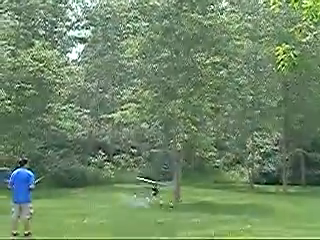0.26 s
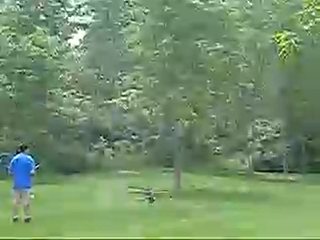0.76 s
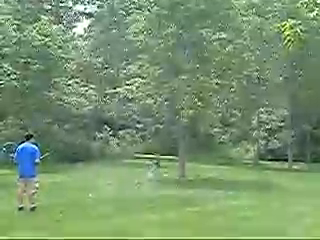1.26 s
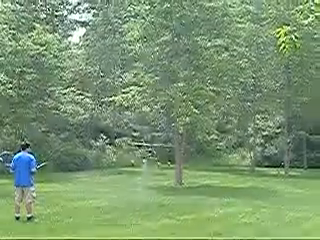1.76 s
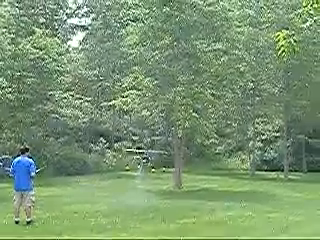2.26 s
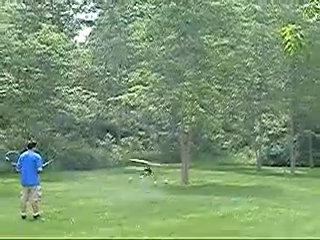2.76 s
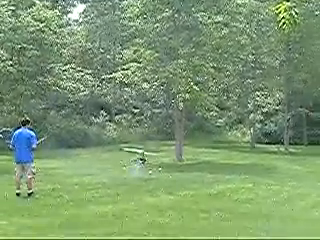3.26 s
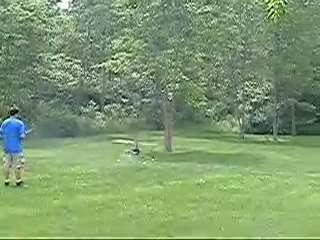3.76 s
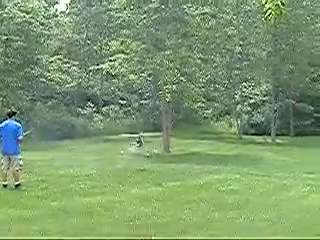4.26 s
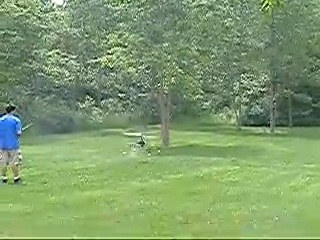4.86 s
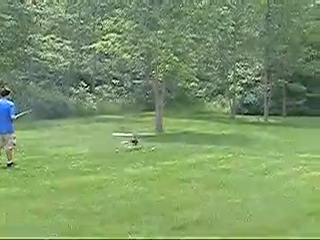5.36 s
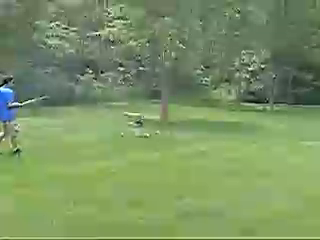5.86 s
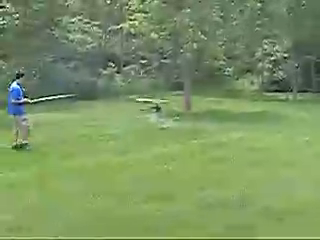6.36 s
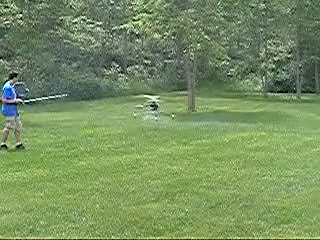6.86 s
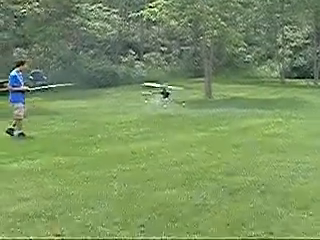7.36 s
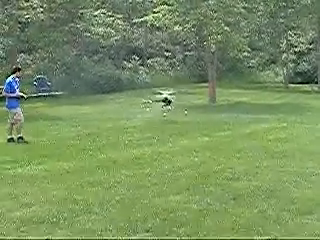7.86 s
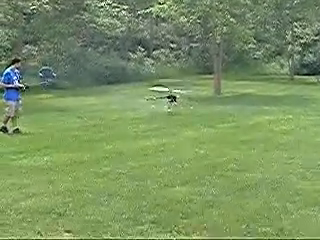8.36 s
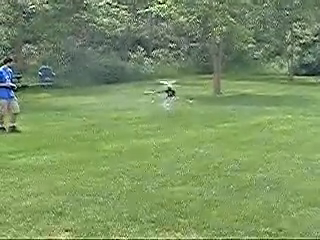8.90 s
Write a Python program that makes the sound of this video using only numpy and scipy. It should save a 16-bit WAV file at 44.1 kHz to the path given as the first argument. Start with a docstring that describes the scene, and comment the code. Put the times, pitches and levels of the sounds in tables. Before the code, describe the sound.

Constant harsh engine buzz from a hovering model helicopter, sputtering and hissing, with chopped rotor air, slight pitch dips and a few faint knocks.

```python
"""A radio-controlled helicopter hovers low over a lawn ringed by trees; its speed sags under load near 1.3 s.
A knock follows at 3.2 s, a second sag near 4.2 s and two more knocks near 6.8 and 7.0 s.
Throughout, the two-stroke runs rich and burns fully only every second or third turn, so the muffler rasps
over a smooth hum and gear hiss. Geared rotors add a chopped rush of air and a tail hum.
The camera eases its level down on loud sound; its narrow-band mono microphone clips the loudest cracks."""
import sys
import numpy as np
from scipy import signal
from scipy.fft import rfft, irfft, next_fast_len
from scipy.io import wavfile
from scipy.ndimage import uniform_filter1d

SR = 44100
rng = np.random.default_rng(int(sys.argv[2]) if len(sys.argv) > 2 else 0)


def dump(signal):
    """Clip the signal to [-1, 1] and save it as 16-bit WAV at the path in sys.argv[1]."""
    limited = np.clip(np.atleast_2d(signal).T, -1, 1)
    pcm = np.round(limited * 32767).astype(np.int16)
    wavfile.write(sys.argv[1], SR, pcm)


N = 402633
T = np.arange(N) / SR  # s
HOVER_TURNS_PER_S = 213.0  # without extra load
BLADES_PER_TURN = 0.225  # main blade passes per engine turn

# engine speed, sagging twice under load: [t/s, speed/(turns/s)]
ENGINE_SPEED = [(0.0, 214.5), (0.46, 210.5), (1.17, 200.5), (1.42, 200.8), (2.03, 210.2), (2.64, 212.2),
                (3.09, 211.7), (3.35, 209.1), (4.21, 204.5), (4.72, 212.7), (5.48, 213.0), (6.09, 215.1),
                (6.9, 212.8), (7.35, 214.4), (7.96, 213.0), (8.52, 215.3), (8.77, 210.9), (9.13, 211.5)]
# low mids, 460-800 Hz, as the helicopter bobs over the grass; used around its mean: [t/s, level/dB]
LOW_MIDS_LEVEL = [(0.0, -13.5), (0.661, -24.5), (0.96, -16), (1.52, -23.5), (1.78, -19.5), (2.939, -19.5),
                  (3.301, -24.5), (3.958, -21), (4.21, -24.5), (5.28, -22.5), (5.88, -17.5), (6.39, -25.5),
                  (7.96, -24), (8.57, -21.5), (9.13, -23.5)]
# mids, 850-1400 Hz; used around its mean: [t/s, level/dB]
MIDS_LEVEL = [(0.0, -24), (0.301, -19.5), (0.86, -33), (1.22, -29.3), (1.62, -22.5), (2.03, -22),
              (2.482, -18.5), (3.8, -32), (4.72, -25), (5.069, -29.5), (6.081, -33), (7.15, -26),
              (7.25, -28), (9.13, -30)]


def gain_of(db):
    """Decibels to amplitude."""
    return 10 ** (np.asarray(db) / 20)


def evened(x):
    """Scales to rms 1."""
    return x / np.sqrt(np.mean(x ** 2) + 1e-20)


def steady(x, span_s=0.1):
    """Holds the mean power even while leaving the fast rasp."""
    size = max(int(span_s * SR), 1)
    power = uniform_filter1d(uniform_filter1d(x ** 2, size), size)
    return x / np.sqrt(abs(power) + 1e-9)


def curves(table, t=T):
    """The columns of a table at the times t."""
    s, *columns = np.transpose(table)
    return [np.interp(t, s, column) for column in columns]


def swell(table, t=T):
    """A level curve in dB around its own mean."""
    db = curves(table, t)[0]
    return db - db.mean()


def spells(table, t=T):
    """Smooth bumps in dB, one for each row [middle/s, half length/s, depth/dB]."""
    return sum(db * np.exp(-((t - s) / half_s) ** 2) for s, half_s, db in table)


def sag(t=T):
    """How far load has pulled the engine below its hovering speed, in turns/s."""
    return HOVER_TURNS_PER_S - curves(ENGINE_SPEED, t)[0]


def wander(rate_hz):
    """Smooth noise of rms 1 with a Gaussian roll-off at rate_hz."""
    size = next_fast_len(N)
    hz = np.fft.rfftfreq(size, 1 / SR)
    spectrum = rfft(rng.standard_normal(size)) * np.exp(-(hz / rate_hz) ** 2)
    return evened(irfft(spectrum, size)[:N])


def read(points, hz):
    """A spectrum at the frequencies hz, on a log axis."""
    f, value = np.transpose(points)
    return np.interp(np.log(hz + 1), np.log(f + 1), value)


def colour(x, points, modes=(), size=8192):
    """Causal filter from a smooth spectrum and resonances that ring after each push."""
    hz = abs(np.fft.fftfreq(size, 1 / SR))
    db = read(points, hz) + sum(lift / (1 + (2 * (hz - f) / width) ** 2) for f, width, lift in modes)
    # the Hilbert transform of the log gain gives minimum phase; reversal makes it causal
    response = np.fft.ifft(np.exp(signal.hilbert(np.log(gain_of(db))))).real
    causal = np.roll(response[::-1], 1)[:size // 2]
    return signal.oaconvolve(x, causal)[:N]


def clicks(s, strength):
    """One push at each time, shared between the two nearest samples."""
    at = np.clip(s * SR, 0, N - 2)
    whole = at.astype(int)
    first = np.bincount(whole, strength * (1 - at + whole), N)
    second = np.bincount(whole + 1, strength * (at - whole), N)
    return first + second


def trees(x, wet_db, t60_s=0.35, first_s=0.003, fade_hz=3.12, count=500):
    """Grass, trunks and leaves scatter echoes; their paths fade in and out as the helicopter moves."""
    wet = np.zeros(N)
    for _ in range(3):
        s = rng.random(count) * t60_s
        signs = rng.choice([-1., 1.], count)
        taps = clicks(first_s + s, signs * gain_of(-60 * s / t60_s))[:SR]
        wet += wander(fade_hz) * signal.oaconvolve(x, taps)[:N]
    return evened(x) + gain_of(wet_db) * evened(wet)


def knocks():
    """Soft knocks near the microphone, each one heavily damped swing."""
    # [t/s, level before damping/dB, f/Hz, decay/s]
    swings = [(3.221, -27, 60.4, 0.008), (6.750, -11, 865, 0.0023), (7.026, -30, 89, 0.0044)]
    out = np.zeros(N)
    for s, db, hz, decay_s in swings:
        age_s = np.maximum(T - s, 0)
        out += gain_of(db) * np.sin(2 * np.pi * hz * age_s) * np.exp(-age_s / decay_s)
    return out


def rotors(turns, chop=0.094, rush_db=-29, tail_db=-40, tail_per_turn=1.175):
    """Both rotors are geared to the engine: the main blades chop a rush of air, the tail blades hum."""
    # rush of air from the blades: [f/Hz, relative density/dB]
    rush_colour = [(15, -8), (50, -28), (85, -19.5), (125, -8), (180, -11.5), (300, -5.5), (450, 2.5),
                   (700, -8), (950, -6), (1400, -8), (2400, -8), (4500, -37)]
    main, tail = BLADES_PER_TURN * turns, tail_per_turn * turns
    rush = colour(rng.standard_normal(N), rush_colour) * (1 + chop * np.cos(2 * np.pi * main))
    tail_gain = gain_of(tail_db + 4.3 * wander(rate_hz=1.4))
    tail_hum = np.sqrt(2) * np.sin(2 * np.pi * tail) * tail_gain
    return gain_of(rush_db) * evened(rush) + tail_hum


def dips():
    """Gain of the rasp through its brief dips."""
    # [middle/s, half length/s, depth/dB]
    brief = [(0.975, 0.098, -4.5), (2.4, 0.22, -1.9), (4.33, 0.094, -1.5), (5.5, .15, -1),
             (7.85, 0.6, -1.2)]
    return gain_of(spells(brief))


def hiss(turns, throb=0.45, hiss_db=-17.0):
    """Escaping gas and meshing gears hiss, throbbing with each turn."""
    # gas and gears: [f/Hz, relative density/dB]
    hiss_colour = [(900, -23.5), (1600, 3.5), (2400, 11), (2900, 2.5), (3400, -2.5), (4000, -10.5),
                   (4400, -16), (4800, -35.5)]
    # narrow resonances: [f/Hz, width/Hz, lift/dB]
    hiss_modes = [(3578, 200, 6.3), (4340, 67, 9.8)]
    drive = rng.standard_normal(N) * (1 + throb * np.cos(2 * np.pi * turns))
    return gain_of(hiss_db) * np.sqrt(dips()) * evened(colour(drive, hiss_colour, hiss_modes))


def whine(turns, fade_db=3.5, db_per_sag=-0.54, follows_mids=0.47):
    """The part of the exhaust that repeats exactly: thin lines that follow the mids and weaken under load."""
    # clean upper exhaust harmonics: [multiple of engine speed, relative level/dB]
    harmonics = [(4, -47.5), (5, -37.5), (6, -42.5), (8, -42)]
    lines = np.zeros(N)
    for k, db in harmonics:
        tone = np.sin(2 * np.pi * (round(k) * turns + rng.random()))
        lines += gain_of(db + fade_db * wander(rate_hz=2.1)) * tone
    return np.sqrt(2) * gain_of(db_per_sag * sag() + follows_mids * swell(MIDS_LEVEL)) * lines


def hum(turns, waver_db=0.56, second_db=-27.0, second_follows_hum=1.7, second_follows_mids=0.62,
        second_db_per_sag=-0.48, third_db=-29.0, third_follows=1.3):
    """The smooth swell of exhaust flow gives three clean low harmonics; the second fades as the speed sags."""
    # first exhaust harmonic, before its waver: [t/s, level/dB]
    first_level = [(0.0, -27), (1.11, -25), (1.32, -26), (3.14, -25.5), (3.45, -24.5), (4.26, -26.5),
                   (5.28, -22), (5.83, -20.5), (6.49, -25), (8.07, -29.5), (8.42, -27.5), (9.13, -27)]
    second = second_db + second_db_per_sag * sag() + second_follows_hum * swell(first_level)
    second += second_follows_mids * (swell(LOW_MIDS_LEVEL) + swell(MIDS_LEVEL))
    third = third_db + third_follows * swell(LOW_MIDS_LEVEL)
    out = np.zeros(N)
    for k, db in enumerate((curves(first_level)[0], second, third), 1):
        tone = np.sin(2 * np.pi * (k * turns + rng.random()))
        out += gain_of(db + waver_db * wander(rate_hz=25)) * tone
    return np.sqrt(2) * out


def sputter(s, surge_db=1.47, need_turns=1.85, need_per_sag=0.04):
    """Depth of surges (dB) and turns of charge a full burn needs: under load the engine burns more often."""
    # calmer or deeper surging: [middle/s, half length/s, extra depth/dB]
    surging = [(3.9, 1, -1.9), (6.9, .55, 1.8)]
    return surge_db + spells(surging, s), need_turns - need_per_sag * sag(s)


def burns(need, chance, weak, spread_db):
    """Fresh charge builds up turn by turn until it burns fully; the turns between give a weak pop."""
    luck, size = rng.standard_normal((len(need), 2)).T
    strength, charge = np.full(len(need), weak, float), 0
    for k, threshold in enumerate(need + chance * luck):
        charge += 1
        if charge > threshold:
            strength[k], charge = 1, 0
    return strength * gain_of(spread_db * size)


def ring(x, hz, width_hz):
    """Two muffler chambers in a row: each push swells softly into a tone and dies away."""
    age_s = T[:SR // 25]
    response = age_s * np.exp(-np.pi * width_hz * age_s) * np.sin(2 * np.pi * hz * age_s)
    return signal.oaconvolve(x, response)[:N]


def muffler(s, strength, rebound=0.4, rebound_turn=0.4897, gas_db=-14, gas_s=0.00084, uneven_db=0.35):
    """Cracks and puffs of gas ring the muffler and rebound inverted about half a turn later."""
    # resonances: [f/Hz, width of each chamber/Hz, relative level/dB]
    resonances = [(1180, 530, -39.5), (1544, 160, -24.5), (1958, 244, -15), (2277, 181, -19.5),
                  (2571, 123, -24.5)]
    before_s = T - rebound_turn / curves(ENGINE_SPEED)[0]
    age = T[:SR // 100] / gas_s
    rasp = np.zeros(N)
    for hz, width_hz, db in resonances:
        # no two burns ring alike
        cracks = clicks(s, strength * gain_of(uneven_db * rng.standard_normal(len(s))))
        puffs = signal.oaconvolve(cracks, age * np.exp(-age))[:N] * rng.standard_normal(N)
        tone = ring(evened(cracks) + gain_of(gas_db) * evened(puffs), hz, width_hz)
        # the rebound favours the odd harmonics, so the rasp follows the speed
        rasp += gain_of(db) * steady(tone - rebound * np.interp(before_s, T, tone))
    return rasp


def uneven_pops(s, burn):
    """Only the unevenness of the burns pops; their even part is the hum."""
    # dull pops: [f/Hz, relative level/dB]
    pop_colour = [(70, -48), (140, -10.5), (290, -4.5), (380, -10.5), (470, -10), (600, -0.5), (740, 2.5),
                  (830, -12), (1000, -10), (1500, -22)]
    # their resonances: [f/Hz, width/Hz, lift/dB]
    pop_modes = [(288.6, 18, 7.2), (522.5, 13, 7), (813, 190, 3)]
    return colour(clicks(s, burn - burn.mean()), pop_colour, pop_modes)


def exhaust(turns, jitter_s=0.000014, flutter_s=0.00003, early_s=0.00004, pops_db=-26.0):
    """Each turn's burn drives a dull pop and a muffler crack, both echoed by the trees."""
    s = np.interp(np.arange(1, int(turns[-1])), turns, T)
    surge_db, need = sputter(s)
    burn = burns(need, chance=0.26, weak=0.4, spread_db=2.0)
    strength = burn * gain_of(surge_db * np.interp(s, T, wander(rate_hz=42)))
    # strong burns arrive a little early, and the crank flutters
    crank_s = flutter_s * np.interp(s, T, wander(rate_hz=45))
    s = s - early_s * burn + jitter_s * rng.standard_normal(len(s)) + crank_s
    rasp = muffler(s, strength)
    pops = uneven_pops(s, burn)
    rasp_outdoors = rasp.std() * dips() * steady(trees(rasp, wet_db=-4.5))
    return rasp_outdoors + gain_of(pops_db) * steady(trees(pops, wet_db=-1))


def flutter(x, turns, sway_s=0.00007, shade=0.081):
    """The exhaust sound sways once per rotor turn and is shaded by each passing blade."""
    blades = 2 * np.pi * BLADES_PER_TURN * turns
    swayed = np.interp(T - sway_s * np.sin(blades / 2), T, x)
    return swayed * (1 + shade * np.cos(blades))


def drift(x, patchy_db=1.2, patchy_hz=2.3, count=9):
    """Height, load and heading shift the colour at the microphone; bands also fade a little by chance."""
    # muffler's bite, 2120-2600 Hz; used around its mean: [t/s, level/dB]
    bite_level = [(0.0, -20), (0.25, -14.5), (0.46, -21), (0.73, -14), (0.89, -23.5), (1.32, -10.5),
                  (1.55, -18), (2.57, -11), (2.97, -20.5), (3.33, -17), (5.36, -14), (5.64, -23),
                  (6.1, -14), (7.48, -23), (8.57, -16), (9.13, -19)]
    # how far each part follows the low mids: [f/Hz, share]
    low_mids_share = [(200, 0.43), (330, 0.62), (480, 0.5), (760, 1), (1000, 0), (1700, -.2), (2000, -0.13),
                      (2300, -0.1), (3000, 0.37)]
    # how far each part follows the mids: [f/Hz, share]
    mids_share = [(300, -.3), (480, -0.64), (740, 0.34), (900, 0.59), (1300, 0.97), (1550, 0.45),
                  (1950, -0.052), (2300, -0.013), (3000, -0.12)]
    # same for the bite; the main resonance below gives way to it: [f/Hz, share]
    bite_share = [(1500, -0.069), (1800, 0.015), (1980, -.25), (2200, 0.72), (2380, 1), (2650, 0)]
    # colour that load adds: [f/Hz, slope/(dB per turn/s of sag)]
    load_slope = [(150, 0), (300, .2), (480, 0), (1750, 0.06), (2000, -0.23), (2200, 0.1748), (2650, -0.27),
                  (4000, 0.27)]
    hz, t, z = signal.stft(x, SR, nperseg=1024)
    pairs = [(low_mids_share, LOW_MIDS_LEVEL), (mids_share, MIDS_LEVEL), (bite_share, bite_level)]
    moved_db = sum(np.outer(read(share, hz), swell(level, t)) for share, level in pairs)
    load_db = np.outer(read(load_slope, hz), sag(t) - sag(t).mean())
    centres_hz = np.linspace(300, 3000, count)
    patches = sum(np.outer(np.interp(hz, centres_hz, band), np.interp(t, T, wander(patchy_hz)))
                  for band in np.eye(count))
    shifted = z * gain_of(moved_db + load_db + patchy_db * patches)
    return signal.istft(shifted, SR, nperseg=1024)[1][:N]


def scene():
    """One engine speed drives every part of the helicopter; both channels carry the same sound."""
    turns = np.cumsum(curves(ENGINE_SPEED)[0]) / SR
    engine = flutter(exhaust(turns) + whine(turns), turns)
    helicopter = drift(engine + hiss(turns) + rotors(turns))
    mono = helicopter + flutter(hum(turns), turns) + knocks()
    return np.array([mono, mono])


def gain_control(x, knee_db=-10.0, squeeze=0.45, span_s=0.069):
    """The camera turns itself down a little while the sound is louder than the knee."""
    size = max(int(span_s * SR), 1)
    power = uniform_filter1d(uniform_filter1d(x[0] ** 2, size), size)
    power_db = 10 * np.log10(abs(power) + 1e-9)
    return x * gain_of(-squeeze * np.maximum(power_db - knee_db, 0))


def record(dry, ceiling=0.99, mic_edge_hz=4800, edge_hz=16000):
    """The microphone clips the loudest cracks and passes a narrow band; overshoots clip at full scale."""
    overloaded = np.clip(gain_control(dry), -ceiling, ceiling)
    mic_filter = signal.firwin(241, mic_edge_hz, window=("kaiser", 9), fs=SR)
    narrow = signal.oaconvolve(overloaded, mic_filter[None], "same")
    edge_filter = signal.firwin(511, edge_hz, window=("kaiser", 9), fs=SR)
    return signal.oaconvolve(np.clip(narrow, -1, 1), edge_filter[None], "same")


dry = scene()
out = record(dry)
dump(out)
```